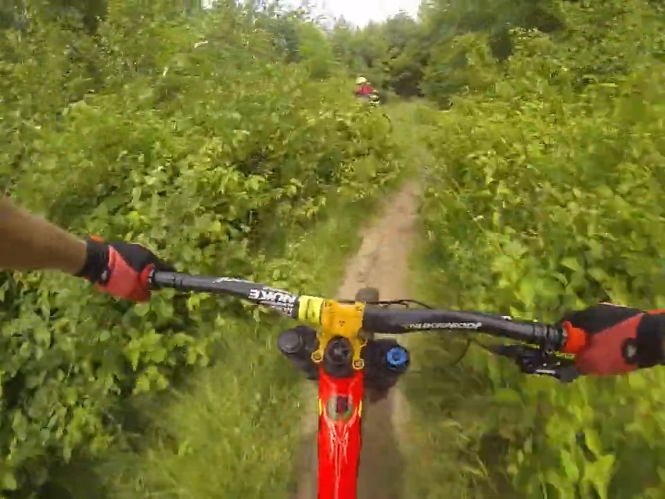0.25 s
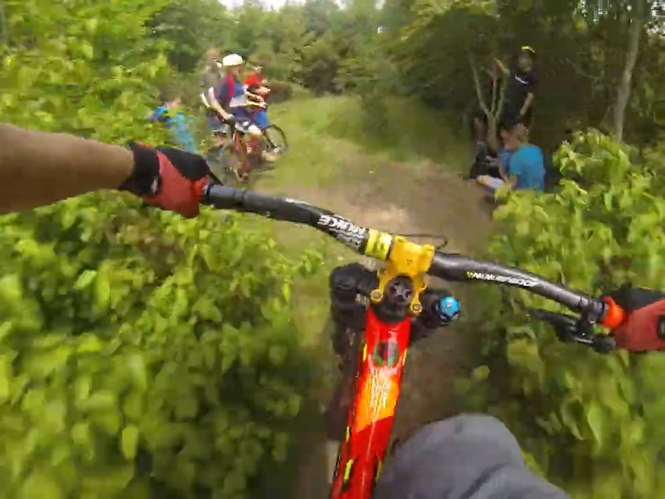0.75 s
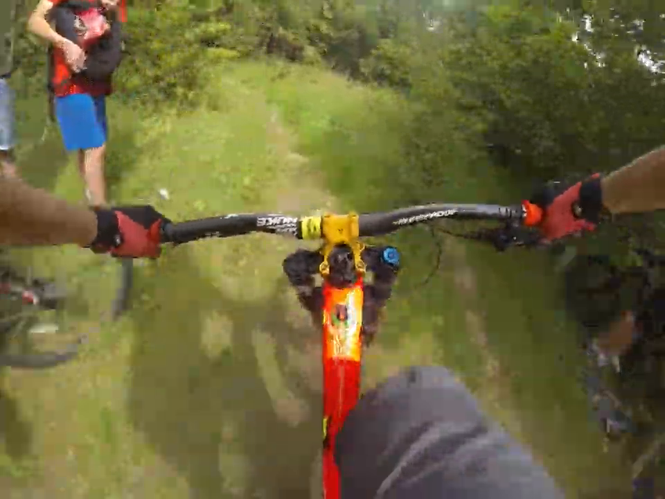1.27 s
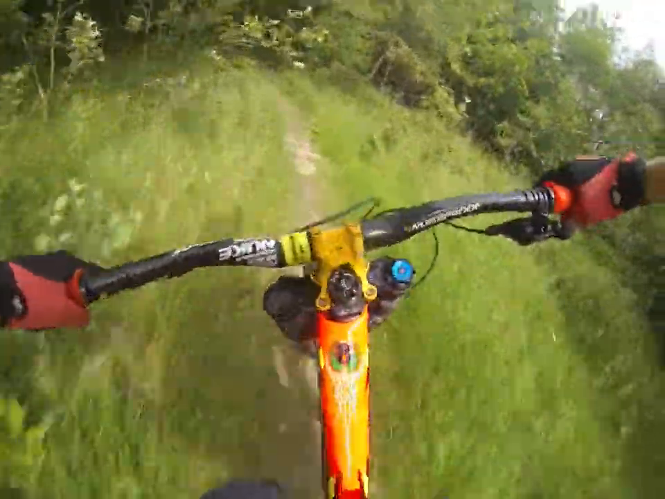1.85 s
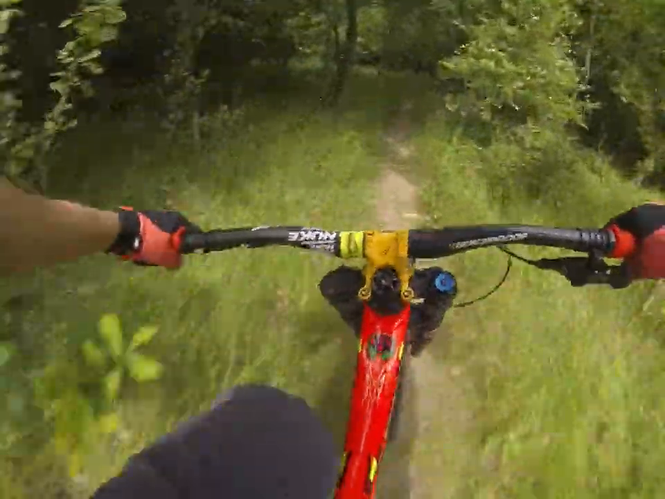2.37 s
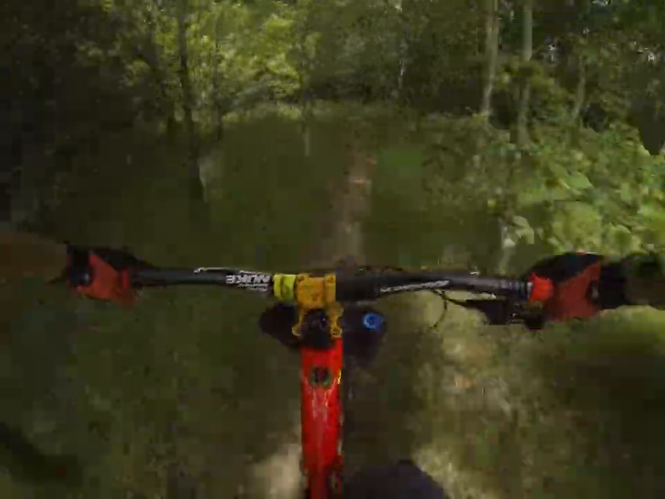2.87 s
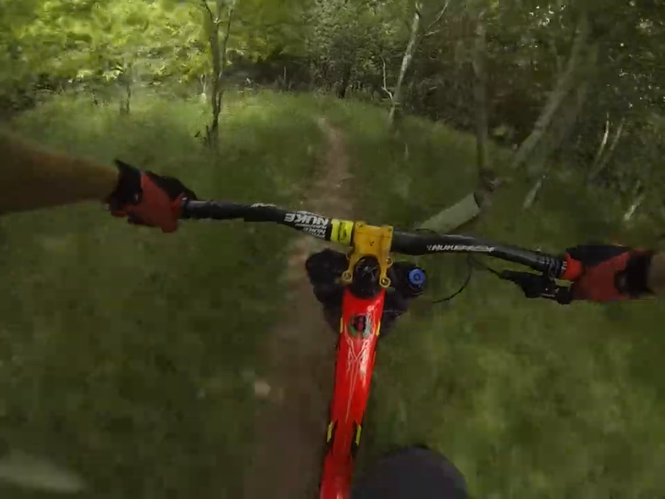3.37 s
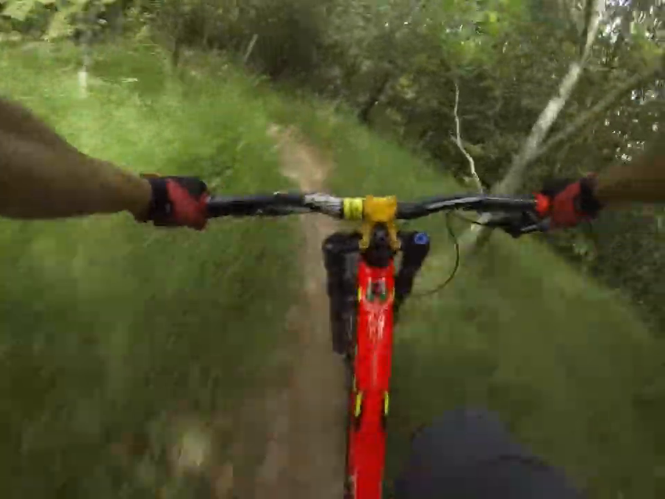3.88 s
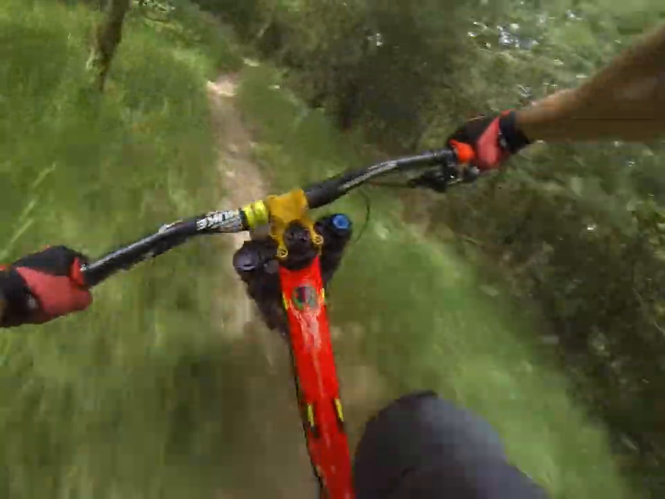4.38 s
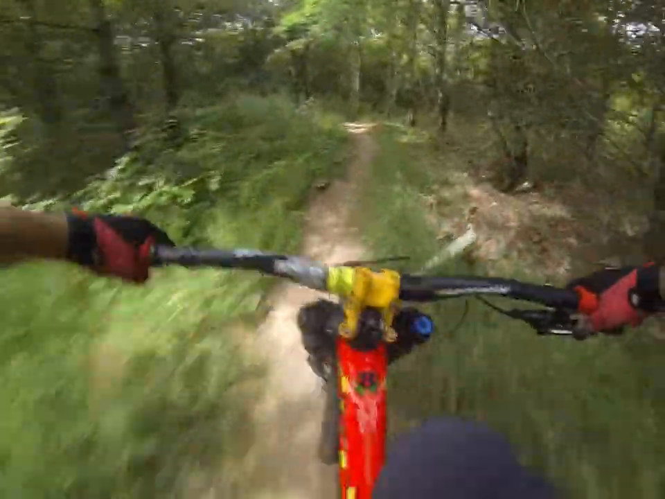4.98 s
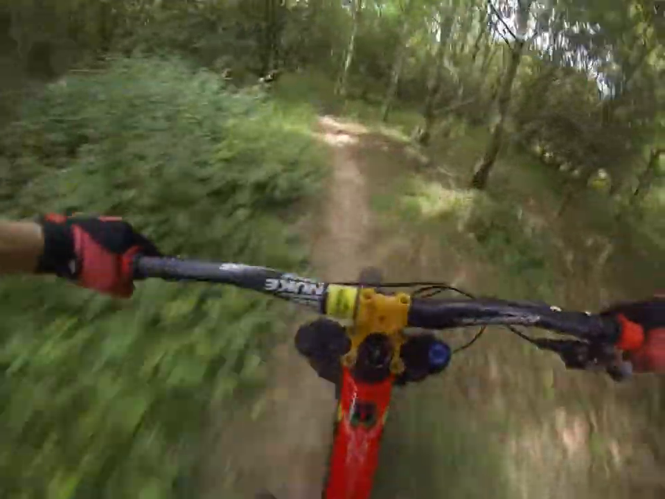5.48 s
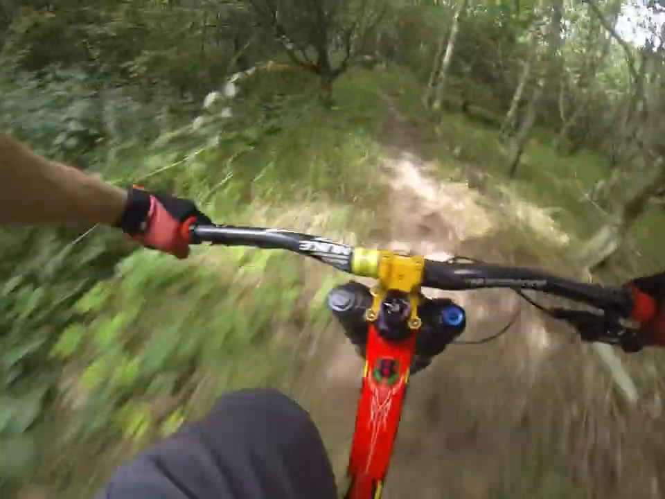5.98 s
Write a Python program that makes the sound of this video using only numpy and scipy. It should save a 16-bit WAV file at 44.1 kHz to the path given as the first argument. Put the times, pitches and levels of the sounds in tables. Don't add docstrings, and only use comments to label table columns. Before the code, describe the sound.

A bike races down a bumpy dirt trail, heard from inside a sealed camera case: deep jolts, constant plastic rattling, hard knocks and one violent whip crack.

```python
import sys
import numpy as np
from scipy import signal
from scipy.fft import rfft, irfft, next_fast_len
from scipy.io import wavfile
from scipy.ndimage import uniform_filter1d, map_coordinates

SR = 44100
rng = np.random.default_rng(int(sys.argv[2]) if len(sys.argv) > 2 else 0)


def put_to_file(sound):
    columns = np.atleast_2d(sound).T
    safe = np.clip(columns, -1, 1)
    whole_steps = np.round(safe * 32767)
    wavfile.write(sys.argv[1], SR, whole_steps.astype(np.int16))


def level_to_linear(level):
    exponent = np.asarray(level, float) / 20
    return 10 ** exponent


N = 275184
T = np.arange(N) / SR

# pitch in Hz, width in Hz, level in dB.
CASE = [(1437, 315, -2.5), (1622, 174.5, 2), (2290, 340, -17.5), (3140, 480, -15.5), (5500, 150, -23.5)]
# frequency in Hz, level in dB.
PORT = [(20, -17.5), (900, -11), (1300, 1), (13500, -1.5), (15200, -45)]
# frequency in Hz, level in dB per Hz.
LEAVES = [(1500, -37), (3500, 1), (4900, 3.5), (5500, 0.5), (6200, 0), (7500, -1), (11500, -13.5),
          (14000, -15.5), (15000, -35.5)]
# frequency in Hz, level in dB per Hz.
CRACK = [(2500, -25), (4500, 2.5), (6000, -1.5), (8000, -7), (12000, -13.5), (14200, -16.5), (15300, -38.5)]


def noise():
    return rng.standard_normal(N)


def unit(x):
    return x / np.sqrt(np.mean(x ** 2) + 1e-20)


def even(x, seconds):
    width = int(seconds * SR)
    power = uniform_filter1d(uniform_filter1d(x ** 2, width), width)
    return unit(x / np.sqrt(np.abs(power) + 1e-12))


def wobble(rate):
    knots = rng.standard_normal(int(N * 400 / SR))
    return map_coordinates(knots, [np.arange(N) * min(rate, 390) / SR])


def filtered(x, response):
    size = next_fast_len(N + SR // 2)
    hz = np.fft.rfftfreq(size, 1 / SR)
    return irfft(rfft(x, size) * response(hz), size)[:N]


def coloured(x, points):
    f, db = np.transpose(points)
    return filtered(x, lambda hz: level_to_linear(np.interp(np.log(hz + 1), np.log(f), db, left=-120, right=-120)))


def resonant(x, modes):
    def response(f):
        total = 0
        for k, (centre, width, db) in enumerate(modes):
            damping = 1j * f * width
            total = total + (-1) ** k * level_to_linear(db) * damping / (centre ** 2 - f ** 2 + damping)
        return total
    return filtered(x, response)


def crackle(per_second, spread_db, t60, bed):
    hits = rng.random(N) < per_second / SR
    starts = hits * level_to_linear(spread_db * rng.exponential(size=N))
    tail = level_to_linear(-60 * np.arange(SR // 10) / SR / t60)
    return noise() * (bed + np.abs(signal.fftconvolve(starts, tail)[:N]))


def swells(rows, floor_db):
    bells = sum(level_to_linear(db) * np.exp(-((T - s) / width) ** 2) for s, db, width in rows)
    return 20 * np.log10(level_to_linear(floor_db) + bells)


def roughness():
    # time in seconds, rattle level in dB.
    ride = [(0.0, -62.5), (0.43, -55.5), (0.62, -54.5), (0.89, -60.5), (1.32, -59), (1.67, -52.5),
            (1.78, -56.5), (2.01, -56), (2.15, -54.5), (2.28, -56), (2.52, -57.5), (3.16, -53.5),
            (3.28, -54.5), (4.05, -53), (4.36, -48), (4.69, -56), (5.2, -59.5), (5.98, -57.5)]
    s, db = np.transpose(ride)
    return np.interp(T, s, db)


def jolt_level():
    # time in seconds, level in dB, width in seconds.
    heaves = [(0.0, -25.5, .03), (.27, -26.5, 0.097), (.49, -17, 0.023), (.72, -24.5, 0.087),
              (.93, -21.5, 0.044), (1.08, -23.5, 0.022), (1.27, -23.5, 0.014), (1.43, -31, 0.11),
              (1.64, -16.5, .025), (1.77, -20, 0.065), (1.92, -22.5, 0.038), (2.07, -22, 0.03),
              (2.3, -19.5, 0.053), (2.48, -21, 0.057), (2.72, -27, .08), (3.1, -32, 0.17),
              (3.27, -31, 0.11), (3.59, -23.5, 0.043), (3.8, -18.5, 0.058), (3.99, -14.5, .05),
              (4.08, -16, .04), (4.22, -20.5, 0.055), (4.33, -19.5, 0.069), (4.45, -25, 0.12),
              (4.8, -31, 0.29), (5.1, -23.5, .05), (5.3, -28, .05), (5.6, -32.5, .2), (6.0, -29.5, 0.11)]
    return swells(heaves, floor_db=-38)


def thump_level():
    # time in seconds, level in dB.
    roots = [(.03, -51), (.42, -38.5), (.85, -48.5), (1.18, -50.5), (1.36, -52.5), (1.599, -39),
             (1.74, -48), (1.88, -36), (2.139, -35.5), (2.3, -46.5), (2.4, -32.5), (2.61, -47.5),
             (2.97, -38.5), (3.21, -50.5), (3.37, -39.5), (3.6, -34), (3.681, -34), (3.77, -42),
             (4.01, -40.5), (4.09, -41), (4.22, -43), (4.33, -35.5), (4.62, -41), (4.78, -39.5),
             (5.28, -49.5), (5.7, -62), (6.12, -45), (6.24, -43)]
    return swells([(s, db, 0.031) for s, db in roots], floor_db=-48.5)


def hiss():
    # frequency in Hz, level in dB per Hz.
    hiss_colour = [(1000, -23), (2500, 13), (4800, -6.5), (5450, 1), (6100, -1.5), (9000, -5.5),
                   (12800, -10), (13500, -42)]
    return level_to_linear(-72.0) * unit(coloured(noise(), hiss_colour))


def wind():
    # frequency in Hz, level in dB per Hz.
    wind_colour = [(70, -26.5), (130, -3), (250, -6.5), (450, -14.5), (950, -20.5), (2500, -25.5),
                   (8000, -56)]
    level_db = -63 + 3.5
    for gain, shaking in [(.2, jolt_level()), (.1, thump_level()), (0.48, roughness())]:
        level_db = level_db + gain * (shaking - shaking.mean())
    lumps = level_to_linear(3.0 * wobble(9.5) + 2.9 * wobble(60))
    return level_to_linear(level_db) * even(coloured(lumps * noise(), wind_colour), 0.17)


def jolts():
    # frequency in Hz, level in dB per Hz.
    jolt_colour = [(5, -20), (11, -1.5), (18, -1), (28, -3), (36, -16.5), (45, -18), (70, -61)]
    # time in seconds, level in dB, width in seconds.
    closing_lean = (6.245, -24, 0.021)
    s, db, width = closing_lean
    end_lean = level_to_linear(db) * np.exp(-((T - s) / width) ** 2)
    return level_to_linear(jolt_level()) * even(coloured(noise(), jolt_colour), .035) + end_lean


def thumps():
    # frequency in Hz, level in dB per Hz.
    thump_colour = [(30, -16.5), (45, 2), (75, -8), (120, -19), (170, -30), (300, -54)]
    return level_to_linear(thump_level()) * even(coloured(noise(), thump_colour), 0.03)


def rattle():
    hits = crackle(per_second=120, spread_db=2.0, t60=0.08, bed=0.48)
    chatter = coloured(resonant(hits, CASE), PORT)
    return level_to_linear(roughness() + 0.5) * even(chatter, 0.096)


def brush():
    rough_db = roughness()
    level_db = -70.5 - 6.5 + .6 * (rough_db - rough_db.mean())
    scrape = coloured(crackle(per_second=76, spread_db=4.5, t60=0.013, bed=.5), LEAVES)
    return level_to_linear(level_db) * even(scrape, .05)


def swipes():
    # start in seconds, end in seconds, level in dB.
    drags = [(0.31, 0.514, -70), (0.506, 0.774, -63.5), (1.47, 1.606, -69.5), (2.073, 2.122, -47),
             (2.17, 2.255, -60), (2.74, 2.863, -69.5), (2.94, 3.03, -67), (3.228, 3.323, -81.5),
             (4.138, 4.176, -60), (4.268, 4.41, -75), (4.42, 4.524, -68.5), (4.907, 5.007, -76),
             (5.105, 5.19, -79), (5.748, 5.915, -78)]
    shape = np.zeros(N)
    for start, end, db in drags:
        rise = np.clip((T - start) / 0.064, 0, 1)
        let_go = np.clip((end - T) / 0.015, 0, 1)
        shape += level_to_linear(db) * rise * let_go
    grains = crackle(per_second=540, spread_db=4.5, t60=0.03, bed=0.63)
    return shape * even(coloured(grains, LEAVES), 0.063)


def knocks():
    # time in seconds, peak in dB, then upper notes and crack in dB relative to the peak.
    taps = [(0.284, -46, 5, -4), (0.3266, -22.5, -7, -22), (0.376, -34, -24, -43),
            (0.3965, -24.5, -9.5, -39), (0.594, -38, -3, -26), (1.306, -26.5, -20, -41),
            (1.55, -28.5, -9.5, -18), (1.6202, -29, -20, -30), (1.6734, -24.5, -30, -28),
            (1.8001, -17.5, -12, -22), (2.299, -24, -17, -22.5), (2.4353, -45.5, 0, -22),
            (2.4781, -32, -23, -35), (2.516, -35.5, -6.5, -22.5), (2.814, -33.5, -4.5, -16),
            (3.2523, -29, -5.5, -23), (3.4993, -28, -15.5, -38), (3.5322, -21, -20, -42.5),
            (3.7185, -17, -17.5, -27.5), (3.7957, -28.5, -29, -31), (4.0402, -27.5, -11.5, -27.5),
            (4.099, -24.5, -35, -39), (4.1654, -19, -6, -31), (4.304, -21, -20, -31),
            (4.3928, -24.5, -6.5, -21.5), (4.494, -17.5, -21, -29), (4.642, -30, -10, -30),
            (4.7808, -27, -10.5, -21.5), (4.901, -32.5, -13, -24.5), (5.8281, -30, -17, -28.5)]
    scuffs = [(.119, -40.5, -7, -33), (0.7308, -27.5, -11.5, -28), (.84, -29, -18, -37),
              (0.9613, -32, -16, -31), (1.1782, -29.5, -12, -20.5), (1.4361, -27, -16, -27),
              (1.503, -31, -13.5, -28), (1.9382, -32.5, -22, -29), (2.322, -34.5, -24, -32),
              (2.35, -32.5, -20.5, -36.5), (2.774, -32.5, -18.5, -17), (2.8932, -27.5, -13.5, -32),
              (3.1024, -33, -24.5, -33.5), (3.151, -34, -15, -32.5), (3.2831, -26.5, -16.5, -28.5),
              (3.4166, -35.5, -25, -34.5), (4.431, -24, -42, -44), (4.954, -32, -20, -21.5),
              (5.1204, -35.5, -10.5, -19.5), (5.2738, -27, -19, -26), (5.4694, -31.5, -12.5, -34.5),
              (5.788, -27, -11, -21.5), (5.8469, -31.5, -14, -40), (5.902, -32, -14, -23),
              (4.012, -35.5, -8, -28), (4.278, -28, -25, -36), (4.322, -34, -20, -23),
              (4.448, -31.5, -10, -25.5), (3.64, -34, -22, -36), (0.3466, -48, -3, -25)]
    # the same, then the thud in dB.
    heavy = [(0.225, -26.5, -22, -42, -16), (.4329, -44, -9, -18, 4.5), (0.4626, -25.5, -3.5, -12, -9),
             (0.6994, -38, -9, -18, -12), (1.2263, -39, -17, -23, -27), (1.2547, -32.5, -10, -25, -25),
             (1.281, -23, -16, -44, -13), (1.571, -20.5, -18, -31, -7), (1.6317, -18.5, -3.5, -20.5, -10),
             (2.0012, -34.5, -37, -39, -12), (2.0853, -60.5, 20, 9, 7.5), (2.205, -43.5, 5.5, -10.5, 5),
             (2.2245, -35.5, -10, -15, -2), (2.5909, -38, -13, -27.5, -5), (2.963, -24.5, -21, -23.5, -12),
             (3.5931, -24, 0, -20.5, -13), (3.5969, -20, -5, -13, -13.5),
             (3.7842, -27.5, -29.5, -41.5, -17), (4.0591, -26, -12, -46, -4), (4.257, -31, -39, -38, -14.5),
             (4.3577, -38.5, -16, -40, 3.5), (5.1701, -33.5, -8, -15, -9), (5.5502, -41, -3.5, -12, -22),
             (5.6489, -22.5, -7.5, -46.5, -6)]
    rows = [(*row, -24.5, 0.017) for row in taps]
    rows += [(*row, -22.5, 0.054) for row in scuffs]
    rows += [(*row, .025) for row in heavy]

    t = np.arange(SR // 12) / SR
    drive = np.zeros((4, N + len(t)))
    for s, db, *parts, t60 in rows:
        burst = rng.standard_normal(len(t)) * level_to_linear(-60 * t / t60) * (1 - np.exp(-t / 0.0001))
        burst = burst / np.linalg.norm(burst) * np.sqrt(t60 / 0.038)
        burst[:3] += .09
        first = round(s * SR)
        strengths = level_to_linear(db + np.array([0, *parts]))
        drive[:, first:first + len(t)] += strengths[:, None] * burst

    lower, upper, crack, thud = drive[:, :N]
    low_ring = level_to_linear(29.5) * coloured(resonant(lower, CASE[:2]), PORT)
    high_ring = level_to_linear(42.5) * coloured(resonant(upper, CASE[2:4]), PORT)
    cracks = level_to_linear(23.0) * coloured(crack, CRACK)
    thuds = level_to_linear(27) * resonant(resonant(thud, [(395, 700, 0.018)]), [(400, 1600, 0)])
    return low_ring + high_ring + cracks + thuds


def whip():
    # start in seconds, hold in seconds, then ring, scrape and crack in dB.
    touches = [
        (2.1202, .002, -7, -15, -21),
        (2.1219, .003, 5, -15, -22),
        (2.1253, .001, -9, -12, -15),
        (2.1332, .0015, -18, -27, -35),
        (2.1392, .005, -25, -36, -50),
    ]
    fades = [2600, 2900, 5800]
    # frequency in Hz, level in dB per Hz.
    scrape_colour = [(100, -11.5), (550, -16.5), (750, -14.5), (1200, -19), (2050, -12), (3000, -16.5),
                     (3400, -20), (4850, -17), (5400, -37.5), (8000, -38.5)]
    # pitch in Hz, level in dB, seconds to fade by 60 dB.
    steel_notes = [(1965, -52, .25), (4436, -57, .8), (5916, -62, .55)]
    shell_notes = [(142, -26.5, 0.011), (333, -20.5, 0.084), (742, -24, 0.057), (958, -26.5, 0.022)]

    touches = np.array(touches)
    first = touches[0, 0]
    t = np.clip(T - first, 0, None)
    now = t + first
    current = np.searchsorted(touches[:, 0], now, 'right') - 1
    start, hold, *peaks = touches[current].T
    levels = np.array(peaks) - np.outer(fades, np.clip(now - start - hold, 0, 1))
    slew_s = .0008
    ring_db, scrape_db, crack_db = uniform_filter1d(levels, round(slew_s * SR), axis=1)
    on = np.clip(t / slew_s, 0, 1) * (now < 2.1485)

    wall = -level_to_linear(ring_db) * np.sin(2 * np.pi * 1610 * t + 0.24 * wobble(250))
    scrape = level_to_linear(scrape_db) * unit(coloured(noise(), scrape_colour))
    crack = level_to_linear(crack_db) * unit(coloured(noise(), CRACK))

    late = np.clip(t - .004, 0, 1 / 44)
    push = level_to_linear(-17.0) * np.sin(2 * np.pi * 44 * late) * level_to_linear(-160 * late)
    ringing = sum(level_to_linear(db - 60 * t / t60) * np.sin(2 * np.pi * hz * t)
                  for hz, db, t60 in steel_notes + shell_notes)
    build_up = np.minimum(t / .003, 1)
    return on * (wall + scrape + crack) + push + build_up * ringing


def scene():
    ride = hiss() + wind() + jolts() + thumps()
    contacts = rattle() + brush() + swipes() + knocks() + whip()
    return (ride + contacts)[None]


def top_cut(x):
    return signal.sosfilt(signal.butter(12, 15200, fs=SR, output="sos"), x)


def record(dry):
    clipped = dry[0] / (1 + np.abs(dry[0]) ** 12) ** (1 / 12)
    limited = filtered(clipped, lambda hz: np.clip((15600 - hz) / 800, 0, 1))
    return top_cut(limited[None])


dry = scene()
out = record(dry)
put_to_file(out)
```